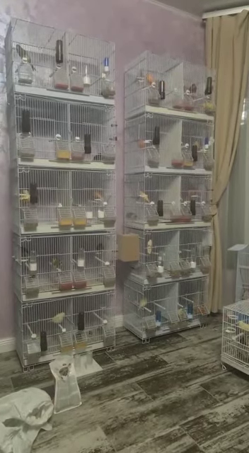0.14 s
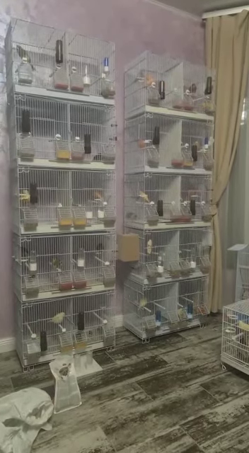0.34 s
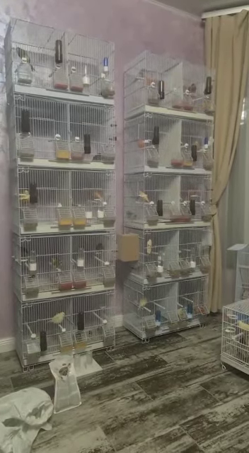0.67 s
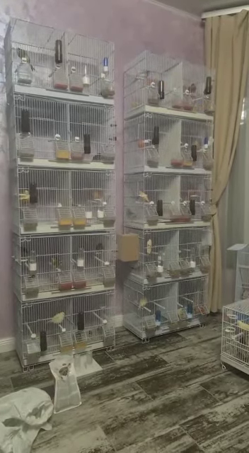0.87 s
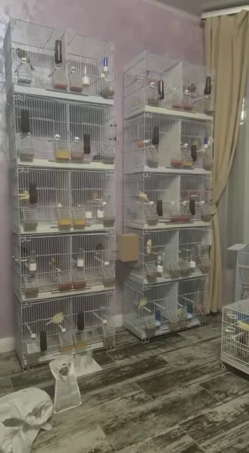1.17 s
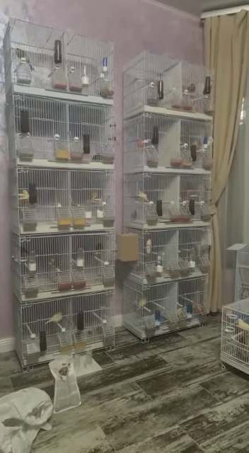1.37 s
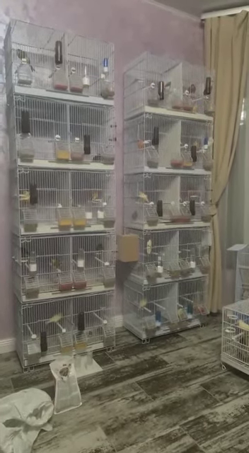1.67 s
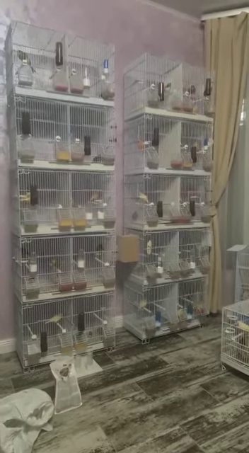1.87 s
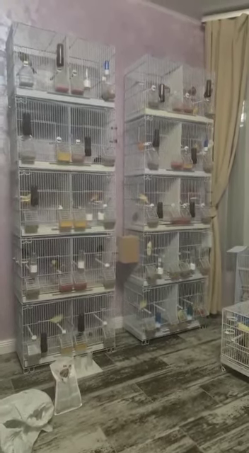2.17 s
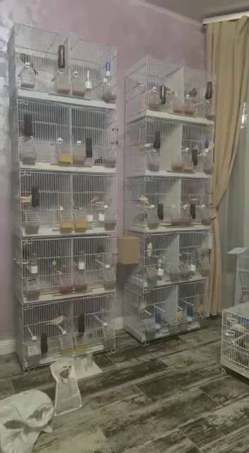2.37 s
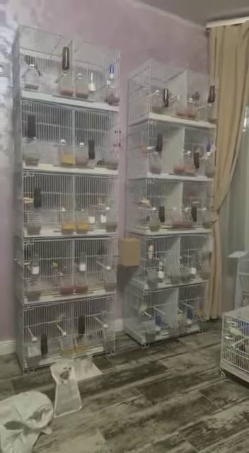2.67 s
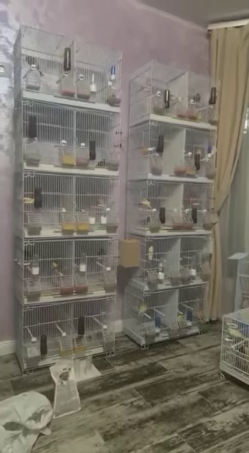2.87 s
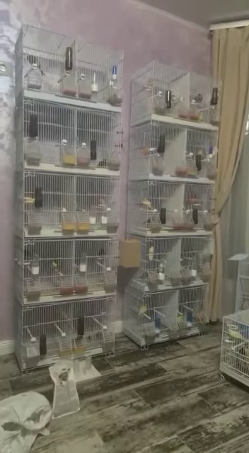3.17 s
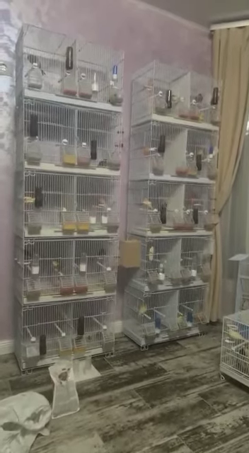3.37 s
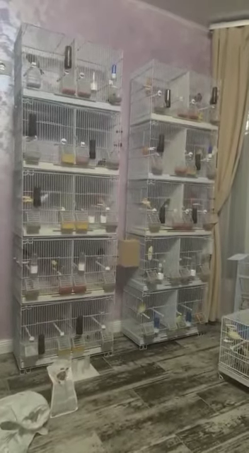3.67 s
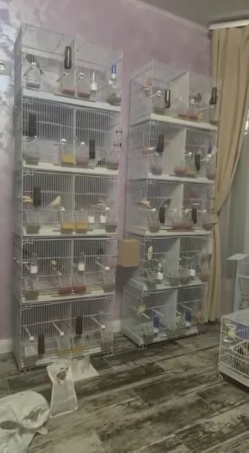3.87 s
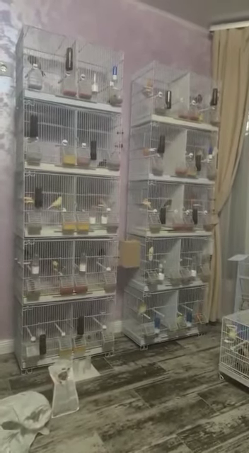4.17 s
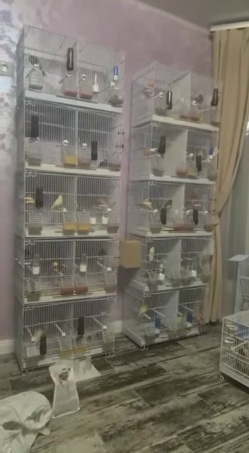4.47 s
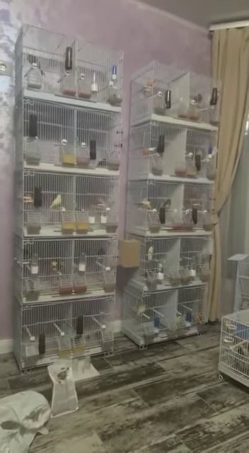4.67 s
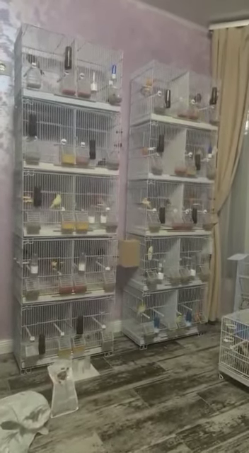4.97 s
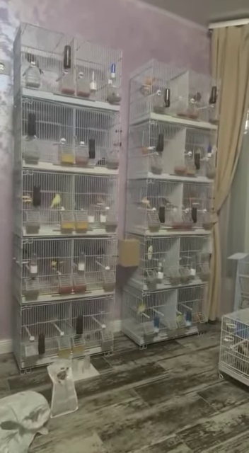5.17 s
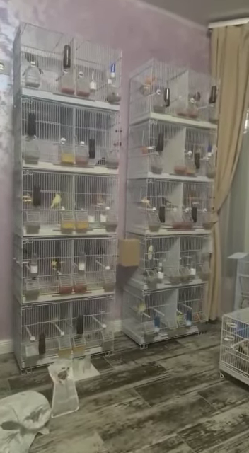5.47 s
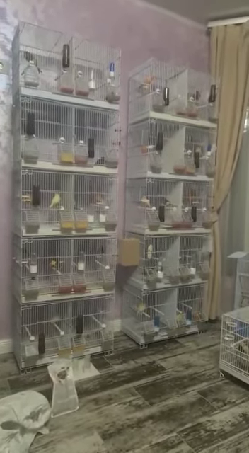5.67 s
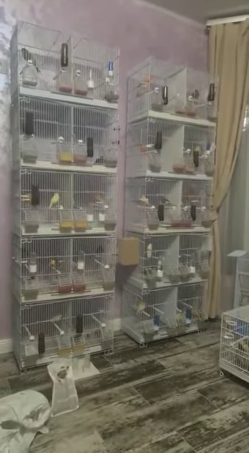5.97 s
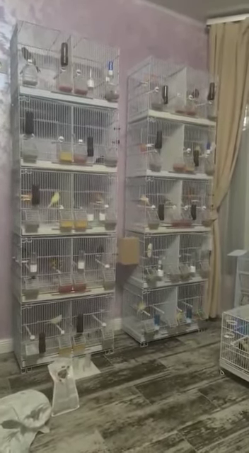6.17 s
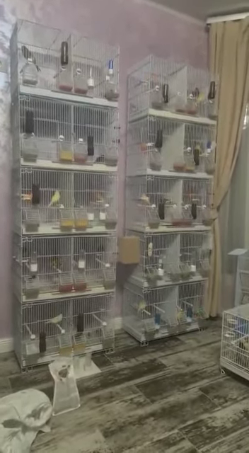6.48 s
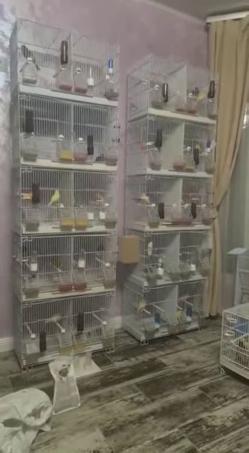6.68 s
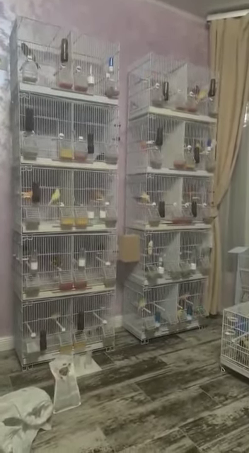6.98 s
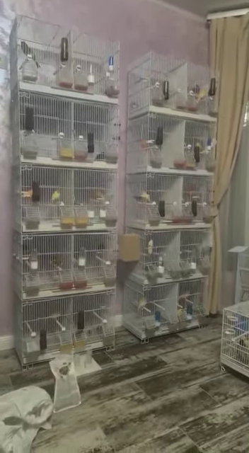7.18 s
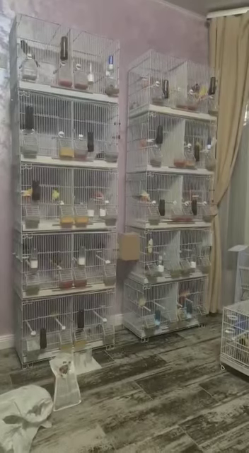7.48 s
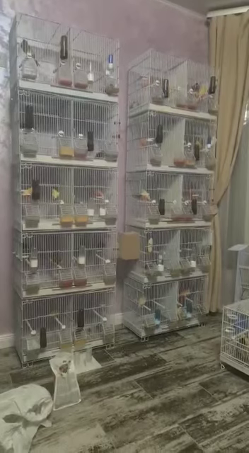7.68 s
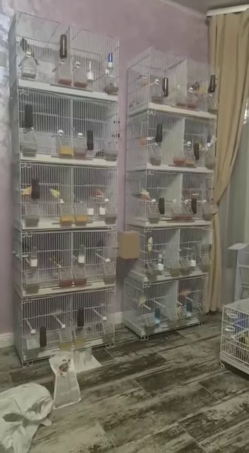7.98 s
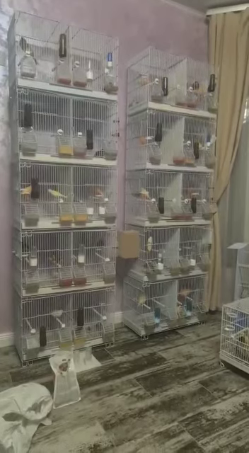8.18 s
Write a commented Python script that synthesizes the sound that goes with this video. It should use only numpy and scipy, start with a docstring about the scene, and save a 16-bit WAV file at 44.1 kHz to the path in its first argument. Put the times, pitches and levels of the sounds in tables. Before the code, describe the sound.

A roomful of small caged songbirds trills and whistles densely, thinning to quiet scattered chirps, with faint wing rustle and soft low bumps.

```python
"""Canaries in a bare room

Caged canaries sing over each other in a bare room with a hard floor, a few metres from a phone.
Each note is a near-pure gliding whistle with weak overtones; delayed copies and decaying noise echo it.
Wings rustle as grainy noise; decaying sines and noise bursts make low bumps through the floor and
dull knocks on the cages; a faint hum and hiss of shaped noise lie under it all."""
import sys
import numpy as np
from scipy import signal
from scipy.fft import rfft, irfft, next_fast_len
from scipy.io import wavfile
from scipy.ndimage import uniform_filter1d

SR = 44100
rng = np.random.default_rng(int(sys.argv[2]) if len(sys.argv) > 2 else 0)


def store_pcm(level_fs):
    """Save levels as 16-bit WAV."""
    pcm = np.round(np.clip(level_fs, -1, 1) * 32767).astype(np.int16)
    wavfile.write(sys.argv[1], SR, np.atleast_2d(pcm).T)


N = 367794

# Overtones of the syrinx, before effort and brightness: multiple, level_db
OVERTONE_LEVELS = [(2, -27), (3, -22), (4, -21.5)]
# Faint hum and hiss, spectral density: frequency_hz, relative_level_db_per_hz
HUSH_SPECTRUM = [(25, -23), (50, -8.5), (78, -1), (120, -7.5), (300, -12.5), (560, -42.5), (660, -4),
                 (780, -12.5), (2500, -18), (6500, -64), (10000, -29), (13000, -32.5), (15500, -29)]
# Rustle of wings, seed and feet over time: time_s, level_db
RUSTLE_LEVELS = [(0, -54.5), (1.1, -59), (1.221, -48.5), (1.4, -62), (3.2, -51), (3.352, -48.5),
                 (4.681, -43.5), (4.849, -54.5), (5.36, -56), (5.419, -48), (6.28, -54), (6.55, -46.5),
                 (7.1, -63), (8.1, -58)]
# Rustle, spectral density: frequency_hz, relative_level_db_per_hz
RUSTLE_SPECTRUM = [(150, -11.5), (400, -4.5), (900, -10), (2500, -7), (6000, -28.5), (9000, -13.5),
                   (15000, -11)]
# Two-note syllable of falling whistles, high then low: start_s, level_db
SYLLABLES = [(-.074, -26), (-.004, -27.5), (.064, -27.5), (.133, -26.5), (.204, -28.5), (.274, -27),
             (.344, -25.5), (.418, -28), (.487, -26.5), (.556, -26), (.626, -28)]
# The two falling notes of that syllable: delay_s, length_s, from_hz, to_hz, level_db
SYLLABLE_NOTES = [(0, .027, 5840, 4827, -2.5), (.015, .03, 4615, 3620, -0.5)]
# Single notes: start_s, length_s, from_hz, to_hz, level_db
SINGLE_NOTES = [(0, .03, 2100, 2162, -33.5), (0.138, 0.0042, 4330, 4530, -15),
                (0.203, 0.036, 3990, 3860, -30), (0.254, 0.011, 3220, 3250, -29.5),
                (0.265, 0.013, 1886, 2024, -41), (0.424, 0.038, 1400, 2450, -43.5),
                (.473, 0.23, 3194, 3280, -44.5), (1.15, 0.015, 3670, 3800, -28),
                (1.232, .016, 3680, 3825, -29), (1.221, .22, 2766, 3070, -31.5),
                (1.312, 0.02, 4120, 3990, -28), (1.345, .022, 4680, 4800, -30),
                (1.398, .03, 4730, 4700, -28.5), (1.719, 0.17, 2540, 2840, -41),
                (3.7, 0.02, 1010, 1180, -40), (3.705, 0.03, 1500, 2500, -42),
                (3.812, 0.029, 4420, 4720, -32.5), (3.836, 0.02, 3340, 2400, -30),
                (4.09, 0.047, 954, 1105, -40), (4.12, 0.04, 1405, 1836, -38),
                (4.121, 0.031, 2610, 3245, -32.5), (4.168, .037, 1685, 2563, -35),
                (4.54, 0.029, 2700, 2370, -40), (4.627, 0.021, 2890, 3250, -35.5),
                (5.245, 0.13, 3117, 2733, -32), (5.468, 0.067, 2430, 2610, -38),
                (6.134, 0.041, 2130, 2740, -40.5), (6.185, 0.057, 1960, 2225, -47.5),
                (6.31, 0.016, 3810, 4200, -37.5), (6.31, .03, 2080, 1950, -50.5),
                (6.322, 0.04, 3300, 3800, -35), (6.335, 0.038, 3720, 5300, -39),
                (6.35, 0.032, 4100, 4900, -39.5), (6.375, 0.028, 3530, 4300, -43.5),
                (6.404, 0.047, 3420, 2826, -31), (6.446, 0.02, 2960, 1860, -41),
                (6.49, 0.064, 4390, 4950, -43.5), (6.512, 0.098, 3363, 3324, -27.5),
                (6.6, 0.047, 1560, 2216, -43.5), (6.6, 0.025, 3680, 4250, -39.5),
                (6.635, .02, 3650, 4500, -36), (6.66, 0.04, 2485, 3400, -35), (6.7, .065, 3350, 3620, -32),
                (6.8, 0.037, 2635, 2910, -40), (6.84, 0.035, 2850, 3450, -34), (6.92, .03, 2490, 3400, -38),
                (7.002, 0.03, 3600, 4000, -35), (7.015, .03, 3200, 3280, -38.5),
                (7.02, 0.09, 2976, 2774, -36), (7.115, .028, 3500, 3950, -42),
                (7.635, .01, 4270, 4350, -49), (7.682, 0.029, 2030, 2800, -40),
                (7.742, 0.018, 1850, 2080, -49.5), (7.875, .04, 2126, 2740, -43),
                (7.971, 0.0091, 2206, 2240, -39), (7.989, 0.0074, 2190, 2200, -34.5),
                (8.023, 0.027, 1337, 1520, -45), (8.025, 0.017, 2170, 2260, -36.5),
                (8.044, 0.0225, 2447, 2492, -39), (8.101, 0.023, 3710, 3720, -44.5),
                (8.189, 0.15, 3853, 3840, -45.5)]
# Held whistles that scoop up: start_s, length_s, scoop_s, pitch_hz, level_db, overtones_db, left_minus_right_db
HELD_WHISTLES = [(1.518, 0.22, 0.014, 4478, -28.5, 0, 1), (1.821, 0.2, 0.0183, 4503, -28, 2, 1),
                 (2.151, 0.21, .035, 4428, -30, 1.5, -1), (6.723, 0.11, 0.049, 4657, -31.5, 2.5, -0.5),
                 (6.926, 0.194, 0.055, 4391, -29, -3, 1.5), (7.35, 0.18, 0.021, 4362, -29, -5, 0.5)]
# Two-step low chirrups: start_s, first_step_hz, level_db
LOW_CHIRRUPS = [(0.482, 1357, -33.5), (3.041, 1287, -28.5), (3.754, 1185, -34.5), (4.24, 1330, -31),
                (5.517, 1311, -31.5), (8.071, 1191, -33)]
# Fast trills: first_s, last_s, notes_per_s, note_length_s, from_hz, to_hz, first_db, last_db,
# left_minus_right_db
FAST_TRILLS = [(0.035, 0.39, 14, 0.0099, 2300, 2740, -33.5, -42, 0.5),
               (0.4, 0.646, 28., 0.0119, 2240, 4170, -29.5, -23, -1.5),
               (.45, .86, 34, 0.026, 6560, 4540, -33.5, -26, 1.5),
               (0.35, 1.017, 31, 0.019, 2400, 3500, -40, -37.5, 0),
               (.36, 0.46, 28., 0.0203, 4400, 5400, -30, -36, -4),
               (0.655, 1.14, 31, 0.011, 4400, 4200, -32.5, -29, -1),
               (2.82, 2.98, 22, 0.025, 1900, 2250, -43, -44, 0),
               (2.16, 2.95, 60, 0.028, 2720, 4420, -42, -57, -1.5),
               (2.842, 3.42, 28, 0.0148, 3250, 3570, -30, -33.5, -3),
               (2.995, 3.11, 24, 0.025, 1900, 2700, -36.5, -40, 1),
               (3.14, 3.34, 24, 0.022, 1850, 2350, -41.5, -39, 1),
               (3.342, 3.75, 20.1, .014, 4070, 2380, -27.5, -30.5, 0.5),
               (3.99, 4.55, 11.15, 0.0181, 2800, 4100, -32.5, -27.5, 0),
               (3.933, 4.5, 11.3, 0.031, 2000, 2300, -37.5, -36, 0.5),
               (8.068, 8.33, 38, 0.024, 1700, 2600, -37, -40, 0)]
# Beaded rattle of short rising notes: centre_s, level_db
RATTLE_BEADS = [(0.6785, -18.5), (0.7137, -16.5), (0.7481, -17.5), (0.7872, -18), (0.8274, -17.5),
                (0.8594, -20), (0.8989, -19.5), (0.936, -21), (0.9707, -20.5), (1.0037, -20.5),
                (1.0489, -19.5), (1.084, -21)]
# Marks along a roll of falling chirps: start_s, top_hz, bottom_hz, loudest_hz, level_db, overtones_db
ROLL_MARKS = [(0.866, 6570, 5325, 5630, -21.5, 6), (1.105, 6580, 4990, 5300, -21, 5.5),
              (1.264, 6630, 4730, 5240, -20, 3.5), (1.66, 6565, 4280, 4740, -20.5, 1.5),
              (2.057, 6176, 4030, 4400, -21.5, -0.5), (2.454, 5864, 3560, 4200, -22.5, -1.5),
              (2.853, 5836, 3505, 4200, -22.5, -2.5), (3.349, 5853, 3580, 4230, -22, -2.5)]
# Place of each mark in the roll: chirp_number
ROLL_MARK_NUMBERS = [0, 3, 5, 10, 15, 20, 25, 31]
# The roller turns towards the phone between these times: time_s
ROLLER_TURN_S = (0.79, 1.93)
# Long falling slurs that end the roll: start_s, length_s, level_db
LONG_SLURS = [(3.408, 0.27, -22.5), (3.738, 0.26, -25.5), (4.03, 0.23, -23.5), (4.328, 0.25, -23.5),
              (4.633, .25, -25), (4.942, .25, -24.5)]
# Low thuds through the floor: start_s, level_db, pitch_hz
FLOOR_BUMPS = [(1.206, -41, 149), (1.388, -45, 77.5), (2.503, -55, 217), (3.214, -41, 426.5),
               (3.699, -70, 275), (4.419, -44, 69.5), (4.942, -53.5, 202), (5.533, -33.5, 72.6)]
# Small dull knocks on the cages: start_s, level_db
CAGE_KNOCKS = [(1.124, -55.5), (1.481, -52), (2.602, -55), (3.72, -54), (5.07, -53.5), (6.085, -53),
               (6.55, -53), (6.792, -55), (7.5, -53), (8.03, -56)]
# Quick rising whips: start_s, length_s, level_db
RISING_WHIPS = [(4.637, 0.035, -22), (4.79, 0.04, -21), (4.955, 0.032, -18.5), (5.132, 0.039, -24),
                (5.291, 0.052, -25.5), (5.461, 0.035, -20), (5.628, 0.039, -23), (5.794, 0.048, -26.5),
                (5.962, 0.049, -22.5)]
# First echoes off shelves and cage walls: left_delay_ms, right_delay_ms, level_db
FIRST_ECHOES = [(2.7, 2.5, -5), (4.4, 4.7, -9), (7.5, 8.0, -9), (9.3, 9.8, -10)]
# Time for the room's tail to decay by 60 dB: frequency_hz, decay_s
ROOM_DECAY = [(300, 0.22), (1500, 0.3), (4300, 0.43), (6500, 0.37), (10000, 0.42), (15000, 0.2)]

# the singing voice
OFF_PITCH_DB = -1  # per octave away from the pitch that the throat is set for
LOUD_DB, EFFORT = -27.5, .66  # overtones change by this many dB per dB away from the loud level
OVERTONE_RASP, HELD_RASP = 1.1, .3  # radians; held whistles rasp less
STEADY_TREMBLE_DB = .6
BRIGHT_HZ = 3770  # notes that end lower lose overtones:
CALL_DULL_DB, TRILL_DULL_DB = -1.5, -6  # per octave below that

# random level grain, standing in for close echoes that roughen quick sweeps
SWEEP_GRAIN_DB, SWEEP_GRAIN_PER_S = 2., 380

SONG_LEAD = SR // 5  # samples; the syllables began earlier, so their echoes already fill the room
CALL_SWELL_S, TRILL_SWELL_S = .006, .005
RISE_S = .04  # a rising note reaches its pitch within this time; a falling one sinks throughout
HELD_BEND, QUICK_BEND, FALL_BEND = 2.3, 1.3, 1.1  # larger bends settle more gently
SCOOP = .72  # starting pitch as a share of the held one
STEP_S, STEP_GAP_S, STEP_FROM_HZ, STEP_TO_HZ, STEP_DB = .0249, .033, 1410, 1786, -1.5
RATTLE_S, RATTLE_FROM_HZ, RATTLE_TO_HZ = .011, 3500, 4260
CHIRP_S, CHIRP_FALL_HZ_PER_S = .037, 64000  # mean speed of the fall; then the bottom pitch rests
ROLL_SCATTER_DB, ROLL_SCATTER = .4, .01  # level in dB, bottom pitch as a share
ROLLER_PAN_DB = 1  # left minus right
SLUR_TOP_HZ, SLUR_END_HZ, SLUR_FALL_S, SLUR_SAG_HZ_PER_S = 6794, 4185, .15, -2000
KNOCK_HZ, BUMP_LOW_HZ = 667.5, 50  # pitch of knocks; highpass for bumps and knocks
WHIP_S, WHIP_FROM_HZ, WHIP_TO_HZ = .036, 1900, 4322
WHIP_CLIMB_HZ_PER_S = 104  # from one whip to the next
WHIP_CREEP_HZ_PER_S = 5000  # the top of a whip keeps rising
GRACE_S = .012

TAIL_BUILD_S = .008
ECHO_CLUMP_DB, ECHO_CLUMPS_PER_S = 1.3, 300  # echoes arrive in uneven clumps
FAR_DB = -4.5  # direct sound of birds that face away
TREBLE_HZ, LEFT_TREBLE_DB, TOP_HZ = 7500, -3, 15900


def undb(db):
    """Decibel law: an amplitude gain is ten to the power of level over twenty."""
    return 10 ** (np.asarray(db) / 20)


def walk(rate, size=N):
    """Random modulation: levels held 1 / rate s and slewed twice, with spread near 1."""
    hold = max(int(SR / rate), 1)
    levels = np.repeat(rng.standard_normal(size // hold + 1), hold)
    slewed = uniform_filter1d(uniform_filter1d(levels, hold), hold)
    return 1.202 * slewed[:size]


# shared by all whistles, read at the time of each note
WAVER = walk(45)
TREMBLE = walk(60)
RASP = np.clip(walk(1500), -2.5, 2.5)


def on_log(hz, table):
    """Logarithmic pitch scale: read a frequency table by linear steps in log frequency."""
    table_hz, values = np.transpose(table)
    return np.interp(np.log(np.maximum(hz, 1)), np.log(table_hz), values)


def noise(table, alike_hz):
    """Spacing against wavelength: coloured noise, rms 1, that is most alike at both ports in the bass."""
    size = next_fast_len(N)
    hz = np.fft.rfftfreq(size, 1 / SR)
    mid, side = rfft(rng.standard_normal((2, size))) * undb(on_log(hz, table))
    side = side * np.clip(hz / alike_hz, .22, 1)
    ports = irfft(np.array([mid + side, mid - side]), size)[:, :N]
    return ports / ports.std()


def flicker(sound, rate, depth_db):
    """Band-wise modulation: each octave of a noise flickers on its own."""
    out, size = 0, next_fast_len(N)
    hz, spectrum = np.fft.rfftfreq(size, 1 / SR), rfft(sound, size)
    for centre in 125 * 2 ** np.arange(7):
        band = np.clip(1 - np.abs(np.log2(np.maximum(hz, 1) / centre)), 0, 1)
        out = out + irfft(spectrum * band, size)[:, :N] * undb(depth_db * walk(rate))
    return out


def grain(song):
    """Amplitude modulation: random level grain stands in for close echoes that roughen quick sweeps."""
    return song * undb(SWEEP_GRAIN_DB * walk(SWEEP_GRAIN_PER_S))


def add(track, sound, start_s, pan_db):
    """Superposition: mix a sound into both ports, with a level difference of left minus right."""
    first = int(start_s * SR)
    i = max(first, 0)
    sound = sound[i - first:][:N - i]
    track[:, i:i + len(sound)] += sound * undb([[pan_db / 2], [-pan_db / 2]])


def whistle(s, length, from_hz, to_hz, glide, db, bend, attack=.0025, release=.0031, throat_hz=None,
            off_db=OFF_PITCH_DB, tremble_db=2., overtone_db=0, climb_hz_per_s=0, rasp=OVERTONE_RASP):
    """Source and filter: the syrinx glides and holds with raspy overtones; the throat favours one pitch."""
    t = np.arange(int(length * SR)) / SR
    at = np.clip(int(s * SR) + np.arange(len(t)), 0, N - 1)
    glide_left = (1 - np.minimum(t / glide, 1)) ** bend
    hz = to_hz + (from_hz - to_hz) * glide_left + climb_hz_per_s * (t - length / 2)
    phase = 2 * np.pi * np.cumsum(hz * (1 + .0052 * WAVER[at])) / SR + 1000 * s
    tone = np.sin(phase) * (1 + .0037 * RASP[at])
    bright_db = overtone_db + EFFORT * (db - LOUD_DB)
    for multiple, level_db in OVERTONE_LEVELS:
        overtone = np.sin(multiple * phase + rasp * RASP[at])
        tone += undb(level_db + bright_db) * overtone * (multiple * hz < .45 * SR)
    swell = np.sin(np.pi / 2 * np.minimum(t / attack, 1))
    fade = np.sin(np.pi / 2 * np.minimum((length - t) / release, 1))
    throat_db = off_db * np.abs(np.log2(hz / (throat_hz or to_hz)))
    return tone * (swell * fade) ** 2 * undb(db + throat_db + tremble_db * TREMBLE[at])


def dulling(to_hz, db_per_octave):
    """Spectral tilt: overtones weaken with each octave that a note ends below the bright pitch."""
    return db_per_octave * max(np.log2(BRIGHT_HZ / to_hz), 0)


def hush():
    """Stationary noise: a faint hum and hiss whose level wavers slightly."""
    return noise(HUSH_SPECTRUM, alike_hz=900.) * undb(-62.5 + .27 * walk(45))


def rustle():
    """Modulated broadband noise: wings, seed and feet are grainy and swell when the birds move."""
    s, db = np.transpose(RUSTLE_LEVELS)
    grainy = flicker(noise(RUSTLE_SPECTRUM, alike_hz=900.), rate=25., depth_db=4.5)
    return grainy * undb(np.interp(np.arange(N) / SR, s, db))


def doubler():
    """Paired glides: two overlapping falling whistles form each syllable, placed later by the song lead."""
    out = np.zeros((2, N))
    for s, db in SYLLABLES:
        for delay, length, from_hz, to_hz, note_db in SYLLABLE_NOTES:
            tone = whistle(s + delay, length, from_hz, to_hz, length, db + note_db, bend=1.607,
                           attack=.0074, release=.007, off_db=-7, tremble_db=STEADY_TREMBLE_DB)
            add(out, tone, s + delay + SONG_LEAD / SR, .6)
    return grain(out)


def callers():
    """Steady and swept tones: whistles, short grainy notes and chirrups from cages left and right."""
    held, quick = np.zeros((2, 2, N))
    for s, length, scoop, hz, db, bright_db, pan_db in HELD_WHISTLES:
        # the scoop starts soft, and the held pitch keeps creeping up
        tone = whistle(s, length, SCOOP * hz, hz, scoop, db, HELD_BEND, climb_hz_per_s=225,
                       attack=CALL_SWELL_S, off_db=-11, overtone_db=bright_db, rasp=HELD_RASP)
        add(held, tone, s, pan_db)
    first_steps = [(s, STEP_S, hz, hz, db) for s, hz, db in LOW_CHIRRUPS]
    second_steps = [(s + STEP_GAP_S, STEP_S, STEP_FROM_HZ, STEP_TO_HZ, db + STEP_DB)
                    for s, hz, db in LOW_CHIRRUPS]
    notes = SINGLE_NOTES + first_steps + second_steps
    for (s, length, from_hz, to_hz, db), side in zip(notes, rng.standard_normal(len(notes))):
        rises, short = to_hz > from_hz, length <= RISE_S
        if not rises:
            bend = FALL_BEND
        else:
            bend = QUICK_BEND if short else HELD_BEND
        glide = min(length, RISE_S) if rises else length
        tone = whistle(s, length, from_hz, to_hz, glide, db, bend, attack=min(CALL_SWELL_S, length / 2),
                       overtone_db=-2.5 + dulling(to_hz, CALL_DULL_DB))
        add(quick if short else held, tone, s, .8 * side)
    return held + grain(quick)


def trillers():
    """Repetition with scatter: quick glides recur, each a little different in pitch and level."""
    out = np.zeros((2, N))
    for first, last, rate, length, from_hz, to_hz, first_db, last_db, pan_db in FAST_TRILLS:
        chance = rng.standard_normal((40, 2))
        for s, (shift, size) in zip(np.arange(first, last, 1 / rate), chance):
            db = np.interp(s, [first, last], [first_db, last_db]) + 1.5 * size
            tune = 1 + .01615 * shift
            tone = whistle(s, length, from_hz * tune, to_hz * tune, length, db, bend=1.2,
                           attack=TRILL_SWELL_S, release=.0018, off_db=-5,
                           throat_hz=np.sqrt(from_hz * to_hz), tremble_db=STEADY_TREMBLE_DB,
                           overtone_db=dulling(to_hz, TRILL_DULL_DB))
            add(out, tone, s, pan_db)
    return grain(out)


def rattler():
    """A train of brief glides: a near bird's short rising notes string into a beaded rattle."""
    out = np.zeros((2, N))
    for s, db in RATTLE_BEADS:
        bead = whistle(s, RATTLE_S, RATTLE_FROM_HZ, RATTLE_TO_HZ, RATTLE_S, db, bend=1.37,
                       attack=.002, release=.0024, off_db=-8, overtone_db=-4.5)
        add(out, bead, s - RATTLE_S / 2, 1.5)
    return out


def roller():
    """Downward frequency sweeps: one bird's long roll of falling chirps ends in slurs."""
    out, number = np.zeros((2, N)), np.arange(ROLL_MARK_NUMBERS[-1] + 1)
    # chirps are evenly spaced between the marks
    columns = [np.interp(number, ROLL_MARK_NUMBERS, column) for column in np.transpose(ROLL_MARKS)]
    rows = np.transpose(columns)
    chance = rng.standard_normal((len(rows), 2))
    for (s, top, bottom, loudest, db, bright_db), (size, shift) in zip(rows, chance):
        bottom = bottom * (1 + ROLL_SCATTER * shift)
        fall_s = (top - bottom) / CHIRP_FALL_HZ_PER_S
        chirp = whistle(s, CHIRP_S, top, bottom, fall_s, db + ROLL_SCATTER_DB * size, bend=1.05,
                        attack=.016, release=.014, throat_hz=loudest, off_db=-11.,
                        tremble_db=STEADY_TREMBLE_DB, overtone_db=bright_db)
        add(out, chirp, s, ROLLER_PAN_DB)
    for s, length, db in LONG_SLURS:
        slur = whistle(s, length, SLUR_TOP_HZ, SLUR_END_HZ, SLUR_FALL_S, db, bend=1.8, attack=.008,
                       release=.059, tremble_db=2.26, throat_hz=4560., off_db=-28.,
                       climb_hz_per_s=SLUR_SAG_HZ_PER_S, rasp=HELD_RASP)
        add(out, slur, s, ROLLER_PAN_DB)
    return grain(out)


def bumps():
    """Damped resonance: thuds and knocks are decaying sines, each with a lowpassed noise slap."""
    out, t = np.zeros((2, N)), np.arange(SR // 3) / SR
    knocks = [(s, db, KNOCK_HZ) for s, db in CAGE_KNOCKS]
    for table, ring_s, slap_db in ((FLOOR_BUMPS, .12, -10.), (knocks, .09, -24.)):
        for s, db, hz in table:
            body = np.sin(2 * np.pi * hz * t) * undb(-60 * t / ring_s)
            dull_noise = signal.lfilter([.3], [1, -.85], rng.standard_normal(len(t)))
            slap = dull_noise * undb(slap_db - 60 * t / .11)
            add(out, undb(db) * (body + slap) * np.minimum(t / .0076, 1), s, -.5)
    highpass = signal.butter(2, BUMP_LOW_HZ, "high", fs=SR, output="sos")
    return signal.sosfilt(highpass, out)


def whipper():
    """Upward frequency sweeps: one steep rising note repeats, reaching a little higher each time."""
    out = np.zeros((2, N))
    for s, length, db in RISING_WHIPS:
        top = WHIP_TO_HZ + WHIP_CLIMB_HZ_PER_S * (s - RISING_WHIPS[0][0])
        # a soft low grace note leads in
        grace = whistle(s - GRACE_S, GRACE_S + .0079, 1650., 2216., GRACE_S, db - 27., bend=.93)
        add(out, grace, s - GRACE_S, .3)
        whip = whistle(s, length, WHIP_FROM_HZ, top, WHIP_S, db, bend=3.6, attack=.0067, release=.019,
                       tremble_db=2.5, overtone_db=-5.5, throat_hz=4070., off_db=-14,
                       climb_hz_per_s=WHIP_CREEP_HZ_PER_S)
        add(out, whip, s, .3)
    return grain(out)


def aside(track, count):
    """Path difference: the right port lags by count samples, or leads if count is negative."""
    return np.array([track[0], np.roll(track[1], count)])


def late(sound, ms):
    """Travel time: a longer path delays the sound."""
    return np.pad(sound, (int(ms * SR / 1000), 0))[:N]


def early(direct):
    """Specular reflection: the direct sound is followed by its first few separate echoes."""
    out = direct
    for left_ms, right_ms, db in FIRST_ECHOES:
        out = out + undb(db) * np.array([late(direct[0], left_ms), late(direct[1], right_ms)])
    return out


def room(dry, echo_db, direct_db=0):
    """Diffuse reverberation: a noise-like tail with its own decay time in each band joins the early sound."""
    t = np.arange(int(.7 * SR)) / SR
    hz = np.fft.rfftfreq(len(t), 1 / SR)
    seed, tail = rfft(rng.standard_normal((2, len(t)))), 0
    for centre in 100 * np.sqrt(2) ** np.arange(16):
        band = np.clip(1 - np.abs(2 * np.log2(np.maximum(hz, 1) / centre)), 0, 1)
        tail = tail + irfft(seed * band, len(t)) * undb(-60 * t / on_log(centre, ROOM_DECAY))
    # long waves are alike at both ports
    shared = rfft(tail[0] - tail[1]) * np.clip(1 - hz / 1300., 0, 1)
    tail[1] = tail[1] + irfft(shared, len(t))
    clumps = undb(ECHO_CLUMP_DB * walk(ECHO_CLUMPS_PER_S, size=len(t)))
    tail = tail * np.clip(t / TAIL_BUILD_S, 0, 1) * clumps
    tail = tail * undb(echo_db) / np.sqrt(np.sum(tail ** 2) / 2)
    echoes = signal.fftconvolve(dry, tail, axes=1)[:, :N]
    return early(dry * undb(direct_db)) + echoes


def scene():
    """Superposition of sources: each group of birds sits elsewhere, so each has its own echoes."""
    turned_db = np.interp(np.arange(N) / SR, ROLLER_TURN_S, [FAR_DB, 0])
    syllables = room(aside(doubler(), count=8), echo_db=1.5)
    birds = np.roll(syllables, -SONG_LEAD, axis=1)  # undo the song lead
    birds += room(aside(callers(), count=-10), echo_db=5.5)
    birds += room(aside(trillers(), count=8), echo_db=0, direct_db=FAR_DB)
    birds += room(aside(rattler(), count=3), echo_db=-1.5)
    birds += room(aside(roller(), count=9), echo_db=2, direct_db=turned_db)
    birds += room(aside(whipper(), count=-11), echo_db=3.5)
    return birds + room(bumps(), echo_db=7.) + rustle() + hush()


def record(dry):
    """Receiver response: the left port is a little duller and the phone cuts the top."""
    highpass = signal.butter(4, TREBLE_HZ, "high", fs=SR, output="sos")
    treble = signal.sosfiltfilt(highpass, dry[0])
    ports = np.array([dry[0] + (undb(LEFT_TREBLE_DB) - 1) * treble, dry[1]])
    return signal.sosfilt(signal.ellip(10, .2, 80, TOP_HZ, fs=SR, output="sos"), ports)


dry = scene()
out = record(dry)
store_pcm(out)
```